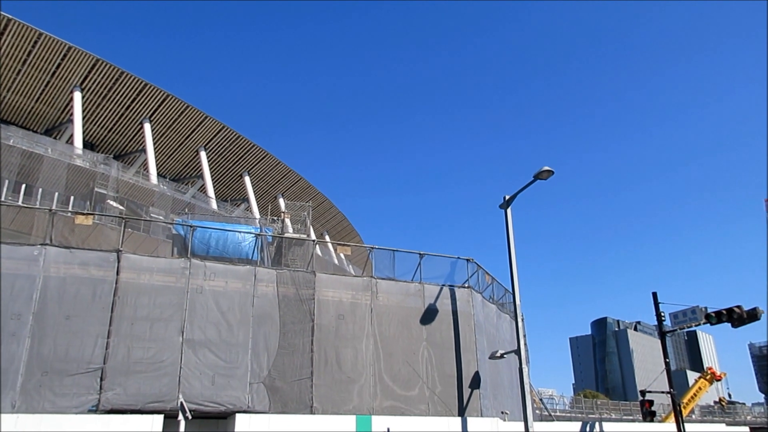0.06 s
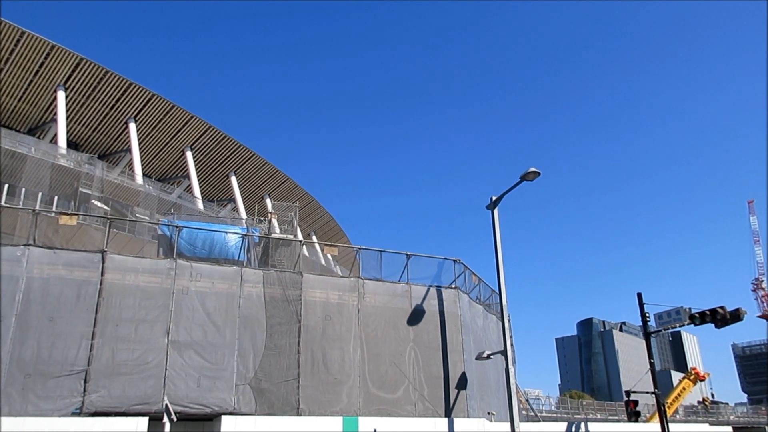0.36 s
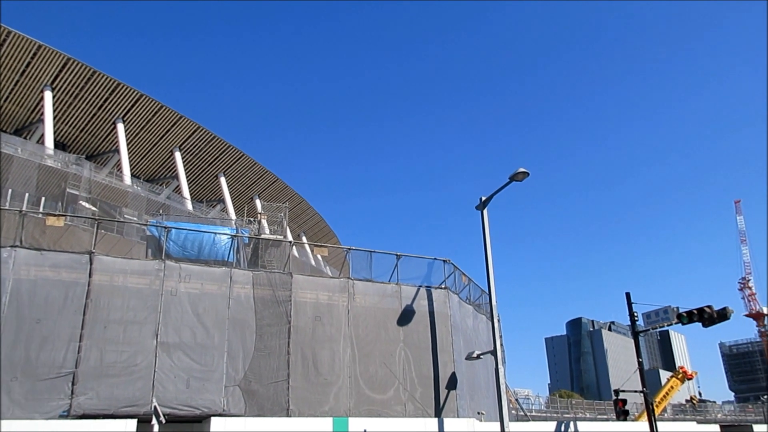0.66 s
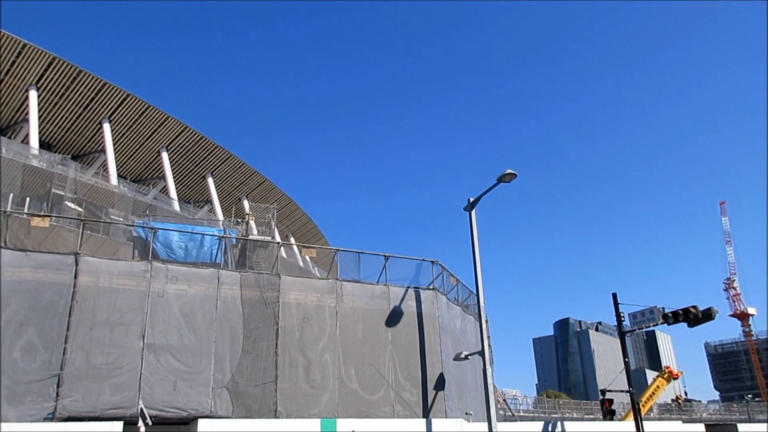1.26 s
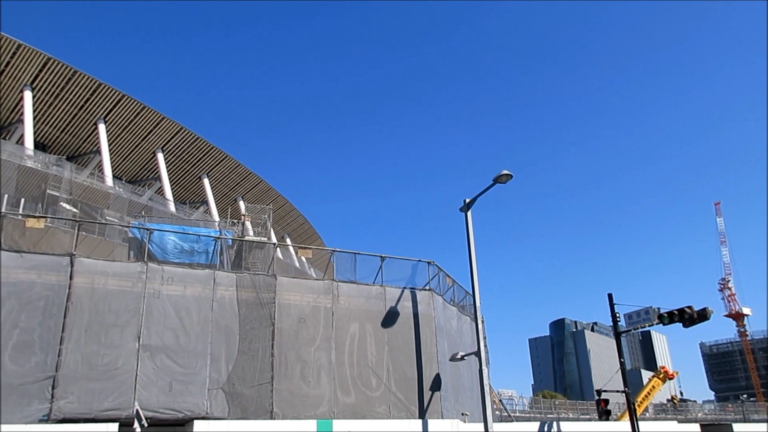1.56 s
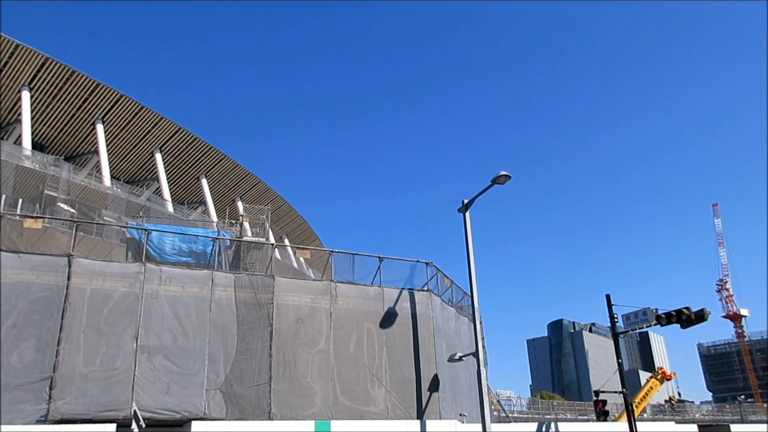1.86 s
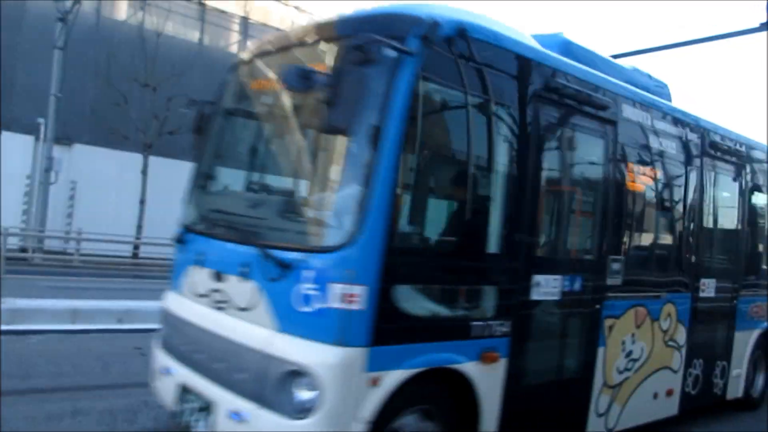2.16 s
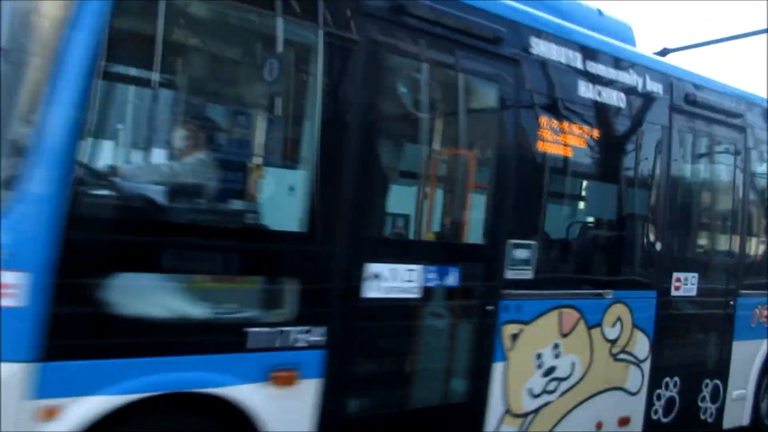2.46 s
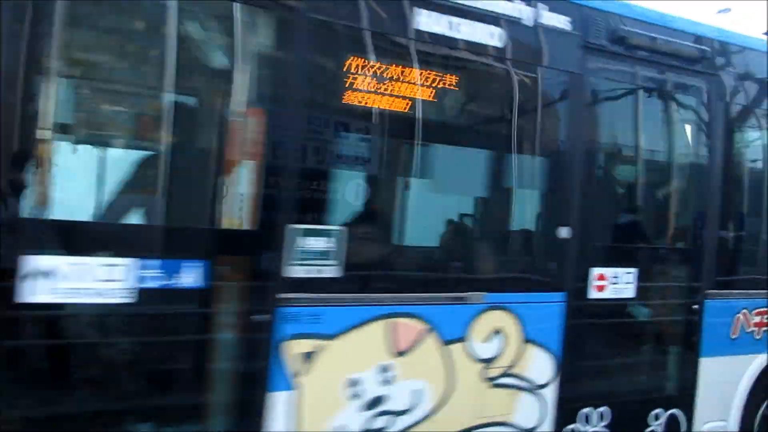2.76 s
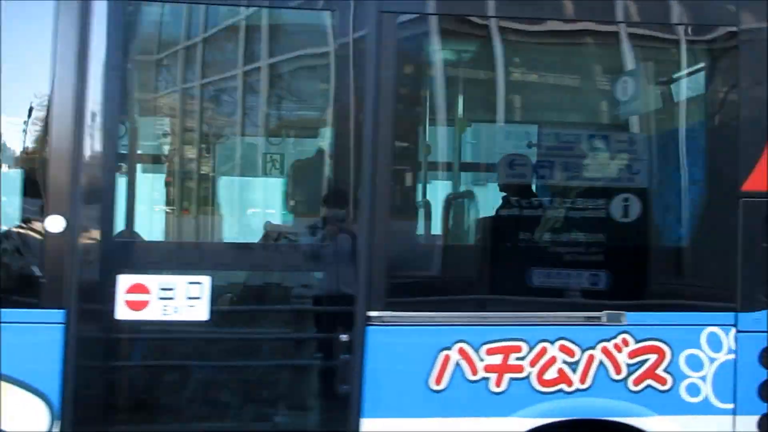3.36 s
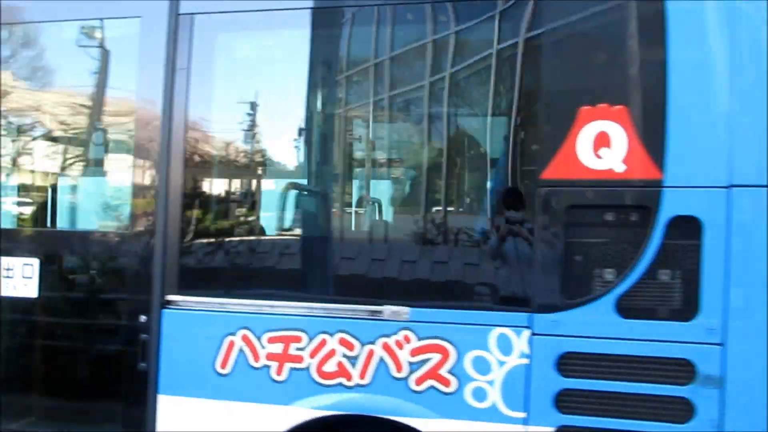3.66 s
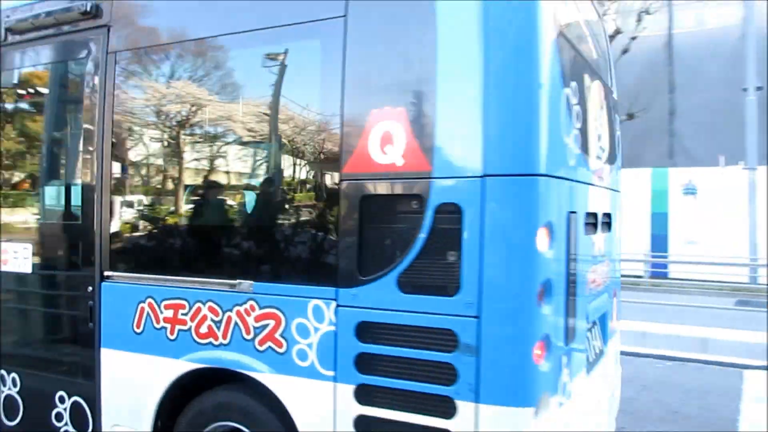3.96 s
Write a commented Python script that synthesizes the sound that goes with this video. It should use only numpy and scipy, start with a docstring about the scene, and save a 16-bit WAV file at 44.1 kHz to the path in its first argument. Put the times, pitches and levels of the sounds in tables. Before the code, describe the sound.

A small bus rolls past very close, with wind buffeting the microphone.

```python
"""A small bus on a breezy street

The tyre roar of city traffic grows quieter while wind thumps on the microphone, until the street sound breaks
off at about 1.9 s. After a short silence the scene changes: a small bus rolls by at arm's length, first its
front tyres, then the rear engine with its hiss, tiny squeaks and thin whistle. The air it drags along buffets
the microphone."""
import sys
import numpy as np
from scipy import signal
from scipy.io import wavfile

SR = 44100
rng = np.random.default_rng(int(sys.argv[2]) if len(sys.argv) > 2 else 0)


def wav_record(signal):
    """Record a signal, one row per channel, as 16-bit PCM in the file named by sys.argv[1]."""
    frames = np.transpose(np.atleast_2d(signal))
    bounded = np.clip(frames, -1, 1)
    # unit amplitude maps onto the largest positive 16-bit level
    quanta = np.round(bounded * 32767).astype(np.int16)
    wavfile.write(sys.argv[1], SR, quanta)


N = 176400
T = np.arange(N) / SR

# Traffic moving away (time [s], roar level [dB], hiss level [dB])
TRAFFIC_LEVELS = [(0, -46.5, -59.5), (.5, -47, -61), (.68, -47, -59.5), (.8, -48.5, -56.5),
                  (.92, -50.5, -63.5), (1.27, -50.5, -65.5), (1.42, -55.5, -71.5), (1.65, -59, -72),
                  (1.9, -67.5, -80.5)]
# Tone of its roar and of its hiss (frequency [Hz], relative level [dB])
TRAFFIC_ROAR_SPECTRUM = [(25, -9), (55, 3), (115, 2.5), (220, -3), (450, -4.5), (900, -7), (1400, -11.5),
                         (2200, -23.5), (4000, -43.5), (8000, -61.5)]
TRAFFIC_HISS_SPECTRUM = [(500, -25), (1400, 1), (2400, 2), (3500, -7.5), (6000, -20.5), (8500, -22.5),
                         (11000, -33), (15000, -35)]
# Faint brakes (start [s], end [s], pitch [Hz], level [dB], width [Hz], fade-out [s])
BRAKE_SQUEALS = [(-.2, 1.1, 2339, -71.5, 8, .25), (-.2, 1.1, 10422, -90, 120, .3),
                 (1.8, 1.85, 13344, -83, 50, 0.041)]
# Short hisses and ticks (start [s], level [dB], rise [s], decay [s], top frequency [Hz])
HISS_PUFFS = [(0.122, -57.5, 0.004, 0.0028, 7000), (.306, -73, .001, .005, 6980),
              (.935, -73, .01, .015, 8000), (1.075, -69, .001, .004, 8000), (1.43, -62, .025, 0.13, 3170),
              (1.832, -74, .001, .004, 4500), (1.895, -75, .001, .002, 12000),
              (2.685, -69, .003, .008, 6000), (2.958, -72, .002, .005, 11000)]
# Wind on the microphone (middle [s], half length [s], level [dB], top frequency [Hz])
WIND_GUSTS = [(0.043, 0.11, -44, 234), (0.36, .09, -53.5, 297), (0.565, 0.2, -56, 244),
              (0.843, 0.036, -45, 200), (1.169, 0.026, -49, 244), (1.273, .04, -54.5, 910),
              (1.315, 0.042, -53.5, 394), (1.514, .018, -54.5, 313), (1.89, 0.071, -58, 400),
              (2.441, .025, -53.5, 162), (2.542, 0.0094, -46, 202), (2.67, .03, -47.5, 510),
              (2.78, 0.068, -48.5, 424), (2.851, 0.0099, -40.5, 610), (2.927, 0.04, -45.5, 516),
              (3.24, 0.021, -45.5, 335), (3.302, 0.025, -42, 300), (3.404, 0.017, -47.5, 347),
              (3.536, 0.04, -46.5, 395), (3.614, 0.02, -44, 650), (3.695, 0.068, -48, 370),
              (3.846, 0.0053, -44, 400), (3.964, 0.032, -44, 404)]
# Single swirls of air hitting the microphone (time [s], peak level [dB], pitch [Hz])
WIND_THUMPS = [(0.012, -27, 157), (0.079, -35, 200), (0.128, -53, 160), (.339, -29, 224),
               (0.403, -31.5, 144), (.83, -31.5, 156), (1.336, -34, 228), (1.384, -37, 262),
               (2.373, -42.5, 134), (2.431, -40, 148), (2.537, -37, 204), (2.549, -34.5, 157),
               (2.65, -45, 380), (2.66, -32.5, 410), (2.689, -32, 330), (2.733, -36.5, 268),
               (2.756, -35.5, 258), (2.81, -32.5, 292), (2.842, -34.5, 455), (2.856, -30, 403),
               (3.299, -30, 150), (3.495, -31, 390), (3.523, -47, 298), (3.536, -27, 205),
               (3.547, -26, 477), (3.549, -34.5, 970), (3.595, -33, 710), (3.609, -31, 594),
               (3.624, -36.5, 550), (3.673, -46, 320), (3.708, -31, 245), (3.731, -34.5, 320),
               (3.833, -33.5, 260), (3.85, -34.5, 204), (3.902, -36.5, 250), (3.949, -35.5, 288),
               (3.962, -31, 378), (3.989, -31.5, 272)]
# The bus going by (time [s], tyre roar level [dB], tyre hiss level [dB], engine level [dB])
BUS_LEVELS = [(2.18, -65, -79, -87), (2.35, -57.5, -72, -76), (2.5, -53, -68, -65), (2.64, -51.5, -66, -70),
              (2.72, -56.5, -71, -69), (2.97, -55, -78.5, -70), (3.06, -58.5, -71.5, -64),
              (3.22, -51, -68, -57.5), (3.52, -56.5, -87, -53.5), (3.575, -58.5, -88, -59),
              (3.7, -59.5, -66, -57), (3.86, -56, -68.5, -55), (4, -56.5, -60.5, -57)]
# Tone of its tyre roar, tyre hiss and engine noise (frequency [Hz], relative level [dB])
BUS_ROAR_SPECTRUM = [(25, -11), (60, -0.5), (120, 1.5), (250, -3.5), (500, -9.5), (900, -10.5),
                     (1400, -15.5), (2500, -39), (6000, -55)]
BUS_HISS_SPECTRUM = [(500, -25), (1400, 5), (2500, -1.5), (4000, -6), (6000, -16.5), (8000, -19.5),
                     (11000, -27), (15000, -31)]
ENGINE_SPECTRUM = [(40, 2), (110, 9), (250, -1), (600, 2.5), (1300, -11.5), (2300, -11), (4000, -16.5),
                   (6000, -21), (7700, -17), (9300, -26.5), (11500, -28.5), (15000, -53)]
# Notes at which the engine rings (pitch [Hz], width [Hz], level against the engine noise [dB])
ENGINE_RESONANCES = [(106.5, 15.4, -5), (1254, 75, -18.5), (1385, 70, -24), (1749, 67, -14.5),
                     (2143, 130, -28)]
# The engine's thin whistle (time [s], level [dB])
WHISTLE_LEVELS = [(2.18, -115), (2.36, -106), (2.43, -88), (2.6, -94), (2.9, -90), (3.06, -80),
                  (3.14, -74.5), (3.3, -72.5), (3.41, -80), (3.49, -71), (3.6, -76), (4, -77)]

STREET_END_S, FADE_OUT_S = 1.898, .007
BUS_START_S, FADE_IN_S = 2.173, .0095
FIRING_HZ, FIRING_DEPTH = 40.23, .19  # how often and how strongly the engine pulses


def from_db(db):
    """Turn decibels into a number to multiply a sound by."""
    return 10 ** (np.asarray(db) / 20)


def unit_power(x):
    """Scale a signal so that its average power is 1."""
    return x / np.sqrt(np.mean(x ** 2) + 1e-20)


def gains(rows):
    """Make one volume curve over time for each level column of a table."""
    times, *columns = np.transpose(rows)
    return [from_db(np.interp(T, times, db)) for db in columns]


def filtered(x, hz, kind, order=2):
    """Keep the lows, the highs or one band of a signal."""
    sos = signal.butter(order, np.clip(hz, 10, .45 * SR), kind, fs=SR, output="sos")
    return signal.sosfilt(sos, x)


def noise_band(low_hz, high_hz, order=2):
    """Noise between two frequencies; its start is dropped so the filter has settled."""
    noise = rng.standard_normal(N + SR // 2)
    return unit_power(filtered(noise, [low_hz, high_hz], "band", order)[-N:])


def ring(hz, width_hz):
    """A note kept ringing by noise: the narrower, the purer."""
    return noise_band(hz - width_hz / 2, hz + width_hz / 2, order=3)


def drift(rate_hz):
    """A smooth random wobble, about 1 in size, with its peaks rounded off."""
    wobble = unit_power(filtered(rng.standard_normal(N + SR), rate_hz, "low")[SR:])
    return unit_power(np.tanh(wobble / 2))


def shaped_noise(spectrum, flicker_db):
    """Noise with a given tone, built from narrow bands that each flicker a little."""
    hz, db = np.transpose(spectrum)
    edges = 20 * 2 ** (np.arange(30) / 3)  # three bands to an octave
    times = np.linspace(0, N / SR, 100)
    out = 0
    for low, high in zip(edges, edges[1:]):
        level = np.interp(np.log(low * high) / 2, np.log(hz), db)
        gain = np.interp(T, times, from_db(level + flicker_db * rng.standard_normal(len(times))))
        out += gain * np.sqrt(high - low) * noise_band(low, high)
    return unit_power(out)


def traffic():
    """The tyres of passing cars roar and hiss, growing quieter as they leave."""
    roar_gain, hiss_gain = gains(TRAFFIC_LEVELS)
    roar = roar_gain * shaped_noise(TRAFFIC_ROAR_SPECTRUM, flicker_db=1.1)
    hiss = hiss_gain * shaped_noise(TRAFFIC_HISS_SPECTRUM, flicker_db=.9)
    return roar + hiss


def brakes(rise_s=.0079):
    """Far-off brakes ring with thin tones that swell and fade."""
    out = 0
    for start, end, hz, db, width, fade in BRAKE_SQUEALS:
        fade_in = (1 + np.tanh((T - start) / rise_s)) / 2
        fade_out = (1 - np.tanh((T - end) / fade)) / 2
        out += from_db(db) * fade_in * fade_out * ring(hz, width)
    return out


def puffs(low_hz=1100):
    """Bursts of bright noise rise quickly and die away; the shortest sound like ticks."""
    out = 0
    for start, db, rise, decay, top_hz in HISS_PUFFS:
        fade_in = np.clip((T - start) / rise, 0, 1)
        fade_out = np.exp(-np.maximum(T - start - rise, 0) / decay)
        out += from_db(db) * fade_in * fade_out * noise_band(low_hz, top_hz)
    return out


def gusts(low_hz=65, lump_db=7.5):
    """Churning air makes swells of lumpy rumble; faster air reaches higher frequencies."""
    lumps = from_db(lump_db * drift(rate_hz=130))
    out = 0
    for middle, half, db, top_hz in WIND_GUSTS:
        air = filtered(lumps * rng.standard_normal(N), top_hz, "low", order=3)
        air = unit_power(filtered(air, low_hz, "high"))
        swell = np.exp(-((T - middle) / half) ** 2 / 2)
        out += from_db(db) * swell * air
    return out


def thumps(half_length_cycles=.39, steepening=.11):
    """A swirl of air crossing the microphone gives one brief pressure swing of random shape."""
    out = 0
    for (time, db, hz), offset in zip(WIND_THUMPS, rng.random(len(WIND_THUMPS))):
        cycles = (T - time) * hz
        bend = steepening * np.tanh(2 * np.pi * cycles)  # speeds up the middle of the swing
        swing = np.cos(2 * np.pi * (cycles + offset) + bend)
        swell = np.exp(-np.minimum((cycles / half_length_cycles) ** 2, 50))
        out += from_db(db) * swell * swing
    return out


def squeaks(firings, pitch_hz=10300, scatter_hz=450, wobble_hz=390, decay_s=.0035, spread_db=6):
    """A tiny squeak at every second engine firing, each with its own strength and pitch."""
    count, fraction = np.divmod(firings / 2, 1)
    strength, detune = rng.uniform(-1, 1, (256, 2))[count.astype(int)].T
    age = fraction * 2 / FIRING_HZ / decay_s  # time since the squeak began, in decay times
    hz = pitch_hz + scatter_hz * detune + wobble_hz * drift(rate_hz=620)
    tone = np.sin(2 * np.pi * np.cumsum(hz) / SR)
    return unit_power(from_db(spread_db * strength) * age * np.exp(-age) * tone)


def engine(jitter_cycles=.15, squeak_db=-25):
    """Noise and ringing notes pulse each time the fuel fires, with squeaks on top."""
    firings = FIRING_HZ * T + jitter_cycles * drift(rate_hz=8)  # a slightly uneven running count
    noise = shaped_noise(ENGINE_SPECTRUM, flicker_db=1.85)
    notes = sum(from_db(db) * ring(hz, width) for hz, width, db in ENGINE_RESONANCES)
    pulse = 1 + FIRING_DEPTH * np.cos(2 * np.pi * firings)
    return (noise + notes) * pulse + from_db(squeak_db) * squeaks(firings)


def whistle(flutter_db=2.8):
    """The engine's thin, high whistle, fluttering in loudness."""
    tone = ring(hz=11890, width_hz=520)
    flutter = from_db(flutter_db * drift(rate_hz=40))
    return gains(WHISTLE_LEVELS)[0] * unit_power(tone * flutter)


def bus():
    """The front tyres roll past first; the rear engine and its whistle follow."""
    roar_gain, hiss_gain, engine_gain = gains(BUS_LEVELS)
    roar = roar_gain * shaped_noise(BUS_ROAR_SPECTRUM, flicker_db=3.0)
    hiss = hiss_gain * shaped_noise(BUS_HISS_SPECTRUM, flicker_db=3.1)
    return roar + hiss + engine_gain * engine() + whistle()


def scene(floor_db=-104):
    """The street, a silent gap, then the bus; wind and puffs of hiss play over both parts."""
    street_on = np.exp(-np.clip((T - STREET_END_S) / FADE_OUT_S, 0, 20))
    bus_on = np.clip((T - BUS_START_S) / FADE_IN_S, 0, 1)
    mix = from_db(floor_db) * noise_band(30, 3000, order=1)  # barely audible steady noise
    mix += street_on * (traffic() + brakes())
    mix += bus_on * bus()
    mix += (street_on + bus_on) * (gusts() + thumps() + puffs())
    return mix[None]  # one channel


def record(dry, cutoff_hz=15000):
    """Cut away the very highest treble with a steep filter."""
    return signal.sosfilt(signal.ellip(10, .1, 70, cutoff_hz, fs=SR, output="sos"), dry)


dry = scene()
out = record(dry)
wav_record(out)
```